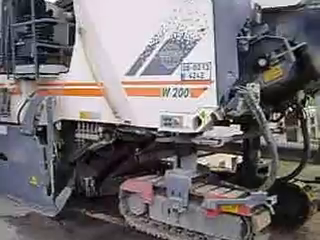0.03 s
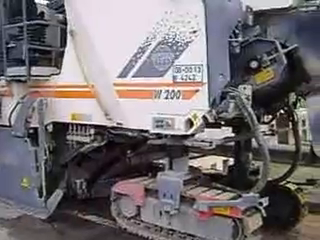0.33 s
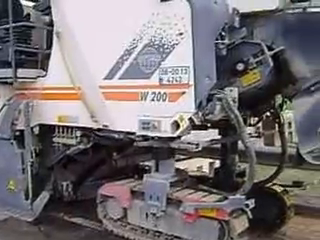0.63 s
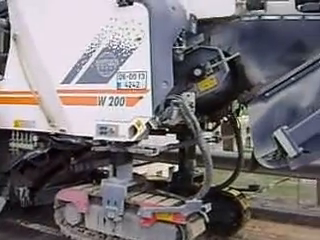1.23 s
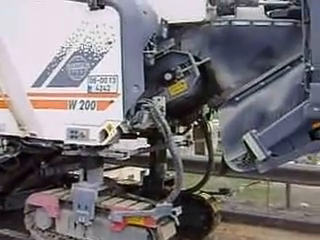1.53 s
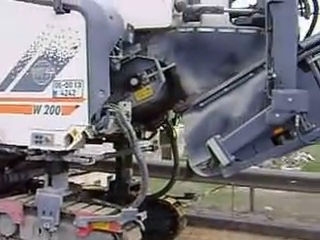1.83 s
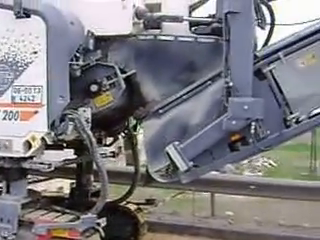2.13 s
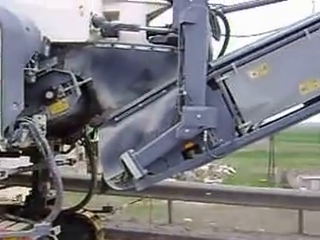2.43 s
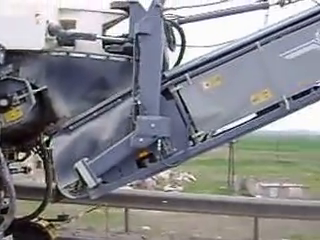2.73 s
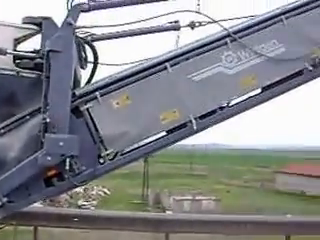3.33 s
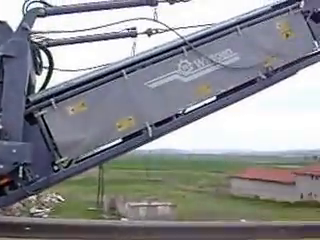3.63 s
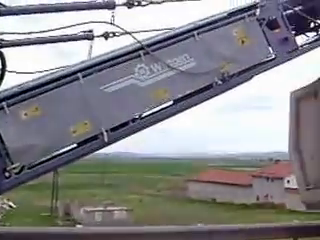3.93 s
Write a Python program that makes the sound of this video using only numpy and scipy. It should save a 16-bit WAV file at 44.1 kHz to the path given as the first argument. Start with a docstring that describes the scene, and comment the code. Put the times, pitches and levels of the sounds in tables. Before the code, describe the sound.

Dense, steady roar of a road milling machine, with crackling grit and lumps hitting steel.

```python
"""A dense roar from the cutting drum and fan of a road milling machine a few metres away.
Grit hisses and crackles on the steel; now and then a lump of asphalt clatters against the panels.
Inside the roar a six-cylinder diesel, two shafts, gears and hydraulic pumps hum and whine.
Tones grow or fade and the hiss drops as the microphone turns from the body to the conveyor."""
import sys
import numpy as np
from scipy import signal
from scipy.fft import rfft, irfft
from scipy.io import wavfile

SR = 44100
rng = np.random.default_rng(int(sys.argv[2]) if len(sys.argv) > 2 else 0)


def waveform_to_disk(signal):
    """Save audio, clipped to [-1, 1], as 16-bit WAV at the path in sys.argv[1]."""
    frames = np.transpose(np.atleast_2d(signal))
    scaled = np.clip(frames, -1, 1) * 32767
    samples = np.round(scaled).astype(np.int16)
    wavfile.write(sys.argv[1], SR, samples)


N = 176400
T, F = np.arange(N) / SR, np.arange(N // 2 + 1) * SR / N + 1e-6


def undb(db):
    """Decibels to gain."""
    return 10 ** (np.asarray(db) / 20)


def unit(x):
    """Scale to rms 1."""
    return x / np.sqrt(np.mean(x ** 2))


def drift(rate_hz):
    """Smooth random curve, rms 1."""
    return unit(irfft(rfft(rng.standard_normal(N)) / (1 + (F / rate_hz) ** 4), N))


def band(lo_hz, hi_hz):
    """Gain of a steep band-pass."""
    return 1 / np.sqrt((1 + (lo_hz / F) ** 20) * (1 + (F / hi_hz) ** 20))


def colour(spectrum):
    """Gain through (f/Hz, level/dB) points, falling away past the ends."""
    hz, db = np.array(spectrum, float).T
    return undb(np.interp(np.log(F), np.log(hz), db)) * band(hz[0], hz[-1])


def ring(modes):
    """Complex response of a set of resonances."""
    return sum(undb(db) / (1 + 1j * (F ** 2 - hz ** 2) / (F * width_hz)) for hz, width_hz, db in modes)


def shaped(x, gain):
    """Filter, then scale to rms 1."""
    return unit(irfft(rfft(x) * gain, N))


def grains(per_s, share):
    """Random small impacts, carrying a share of the power, in a smooth rush."""
    clicks = (rng.random(N) < per_s / SR) * rng.standard_normal(N)
    return np.sqrt(share) * unit(clicks) + np.sqrt(1 - share) * rng.standard_normal(N)


def turn_gain(db, change_db):
    """Gain of a tone over the microphone's turn; passes db at mid-turn."""
    return undb(db + change_db * (T / T[-1] - .5))


def hum(cycles, harmonics):
    """Clean harmonics of a rotating part, random phases."""
    return sum(np.sqrt(2) * turn_gain(db, change_db) * np.sin(2 * np.pi * (k * cycles + rng.random()))
               for k, db, change_db in harmonics)


# Roar and rumble spectra: f/Hz, relative level/dB
ROAR_SPECTRUM = [(65, -29.5), (110, -12.5), (140, -7.5), (182, -5), (212, -4.5), (231, -1), (325, -3),
                 (451, -6), (519, -5.5), (579, -0.5), (654, -2.5), (721, -1), (927, -1), (1090, -4.5),
                 (1180, -6.5), (1220, -7), (1290, -11), (1500, -15.5), (1950, -34), (3300, -120)]
RUMBLE_SPECTRUM = [(18, -23), (28, -17.5), (39, -3.5), (52, -11.5), (75, -7.5), (100, -7), (120, 4.5),
                   (150, -21.5)]


def drum_and_fan():
    """Picks and fan roar over a low rumble; half-octave bands swell together and flicker alone."""
    roar_db, swell_db, flicker_db, rumble_db = -14.5, .43, .53, -31.5
    spectrum = rfft(grains(per_s=600, share=.09)) * colour(ROAR_SPECTRUM)
    half_octaves = 2 * np.log2(np.clip(F / 125, 1, 16))
    bands = (irfft(spectrum * np.maximum(1 - abs(half_octaves - k), 0), N) for k in range(9))
    roar = unit(sum(part * undb(flicker_db * drift(10)) for part in bands))
    rumble = shaped(rng.standard_normal(N), colour(RUMBLE_SPECTRUM))
    return undb(roar_db + swell_db * drift(23)) * roar + undb(rumble_db) * rumble


# Spectrum of grit on steel: f/Hz, relative level/dB
GRIT_SPECTRUM = [(820, -29), (1400, -6.5), (1730, -2), (1920, -4), (2060, -3), (2410, -4), (2590, -3.5),
                 (2660, -6), (2980, -4), (3890, -2.5), (5040, -15), (5930, -28.5), (7710, -74.5),
                 (13000, -120)]
# Hiss over the turn, before trim: t/s, low-band level/dB, high-band level/dB
HISS_LEVELS = [(.1, -26.5, -27), (0.601, -26.5, -26.5), (1.05, -25.5, -26.5), (1.598, -26, -28.5),
               (2.001, -26.5, -28.5), (2.4, -26.5, -29), (3, -28.5, -29.5), (3.399, -31, -30.5),
               (4, -29, -29.5)]


def grit():
    """Crumbs hiss on the steel, fading as the microphone turns off the body."""
    trim_db, flicker_db = -.5, .72
    t_s, low_db, high_db = np.array(HISS_LEVELS).T
    hiss = 0
    for db, lo_hz, hi_hz in (low_db, 1300, 3070), (high_db, 3440, 5700):
        crumbs = shaped(grains(per_s=1400, share=.2), colour(GRIT_SPECTRUM) * band(lo_hz, hi_hz))
        hiss += undb(np.interp(T, t_s, db)) * crumbs
    return hiss * undb(trim_db + flicker_db * drift(4))


# Lump hits: t/s, level/dB, rise/s, decay/s, low f/Hz, high f/Hz, dry crunch beside the ring/dB
LUMP_HITS = [(0.751, -14, 0.0052, 0.028, 2950, 4060, -2), (.85, -20.5, .004, 0.026, 2600, 4600, -4),
             (1.016, -26, .004, 0.036, 1550, 2830, -4), (1.292, -20, 0.0022, 0.014, 3000, 4200, -10),
             (1.357, -20.5, 0.0048, 0.033, 3070, 4810, -13), (1.407, -16.5, 0.0024, .014, 3000, 4170, -12),
             (1.468, -16.5, 0.0066, 0.021, 2500, 3900, 11), (1.779, -16.5, 0.0081, 0.026, 2800, 4300, -1),
             (2.1077, -11.5, 0.0013, 0.024, 1710, 4350, -19), (2.175, -25, 0.0045, 0.016, 3900, 4660, -8),
             (2.608, -26, 0.0043, 0.02, 4300, 4770, -22), (2.82, -28.5, .005, .03, 3270, 5050, -14),
             (3.159, -16.5, 0.027, 0.033, 1920, 4630, 9.5)]
# Panel resonances: f/Hz, width/Hz, relative level/dB
PANEL_MODES = [(1880, 80, 2), (2140, 110, 0), (2530, 80, -7), (3200, 70, -8), (3460, 90, 0), (3610, 60, -1),
               (3930, 100, 2), (4320, 70, -7), (4680, 90, -11)]


def lumps():
    """Each lump strikes, then shatters in a spray of impacts that rings part of the panel's modes."""
    strike_db, strike_s = -9.5, .0017
    out, panel = 0, abs(ring(PANEL_MODES))
    for t_s, db, rise_s, decay_s, lo_hz, hi_hz, crunch_db in LUMP_HITS:
        age_s = T - t_s
        envelope = np.clip(age_s / rise_s, 0, 1) * np.exp(-np.maximum(age_s - rise_s, 0) / decay_s)
        envelope *= 1 + undb(strike_db) * np.exp(-abs(age_s) / strike_s)
        response = (panel + undb(crunch_db)) * band(lo_hz, hi_hz)
        out += undb(db) * envelope * shaped(grains(per_s=2000, share=.29), response)
    return out


# Firing harmonics: multiple, level/dB, change over turn/dB
FIRING_HARMONICS = [(2, -33.5, 2.5), (3, -25.8, 4), (4, -48, -1), (6, -35.5, 16)]
# Exhaust and casing resonances: f/Hz, width/Hz, relative level/dB
EXHAUST_MODES = [(137.5, 9, 4), (149.6, 10, -4), (245, 46, -3), (288.4, 28, -4.5), (590.6, 14, 2)]


def diesel(clock_s):
    """Uneven firings ring the exhaust over the engine's steady note."""
    firing_hz, scatter, exhaust_db = 76.52, 1.3, -27.5
    cycles = firing_hz * clock_s
    firings = np.diff(np.floor(cycles), prepend=0) * (1 + scatter * rng.standard_normal(N))
    exhaust = shaped(firings, ring(EXHAUST_MODES) * band(140, 750))
    return hum(cycles, FIRING_HARMONICS) + undb(exhaust_db) * exhaust


# Shaft and pump harmonics: multiple, level/dB, change over turn/dB
FAST_SHAFT_HARMONICS = [(1, -50, 6.5), (2, -34.5, -2.5), (4, -46, 5), (5, -40, -6)]
SLOW_SHAFT_HARMONICS = [(2, -41, 0), (3, -49, 0), (4, -38, 0), (6, -37, 0), (8, -43, 0), (15, -43, 0)]
PUMP_HARMONICS = [(1, -40, -2), (2, -29.5, 6), (3, -35.5, 10), (4, -31, -0.5)]


def shafts_and_pump(clock_s):
    """Two shafts throb against each other under the pump's drone."""
    fast_hz, slow_hz, pump_hz = 29.27, 24.98, 137.6
    shafts = hum(fast_hz * clock_s, FAST_SHAFT_HARMONICS) + hum(slow_hz * clock_s, SLOW_SHAFT_HARMONICS)
    return shafts + hum(pump_hz * clock_s, PUMP_HARMONICS)


# Gear and hydraulic tones: f/Hz, level/dB, change over turn/dB, pitch wander/fraction
GEAR_TONES = [(133.4, -35, -8, .004), (582, -31, -3, .0012), (590.2, -34.5, 0, .0008), (624, -39, 0, .001),
              (734, -36.5, 0, .0015), (798.5, -36.5, 0, .001), (920, -39, 0, .001), (1147, -37, 0, .001),
              (1199.3, -27.9, 3.5, .001), (1266, -39.5, -2, .002)]
# Thin whistles on the body side: same columns
BODY_WHISTLES = [(2534, -40.5, -7, .002), (3165, -48, 0, .0015), (4015, -44, -4, .003)]


def whines():
    """Gear and hydraulic tones and thin whistles, each wavering in pitch and strength."""
    out, flutter_db = 0, 1.8
    for hz, db, change_db, wander in GEAR_TONES + BODY_WHISTLES:
        cycles = np.cumsum(hz * (1 + wander * drift(8.45))) / SR
        tone = np.sin(2 * np.pi * cycles) * undb(flutter_db * drift(6))
        out += turn_gain(db, change_db) * unit(tone)
    return out


def scene():
    """Mono mix; diesel, shafts and pump follow one governed speed."""
    speed = 1 + .00054 * drift(2)
    clock_s = np.cumsum(speed) / SR
    machinery = diesel(clock_s) + shafts_and_pump(clock_s) + whines()
    return (machinery + drum_and_fan() + grit() + lumps())[None]


def lowpass(x, hz):
    """Steep treble cut."""
    return signal.sosfilt(signal.ellip(10, .1, 80, hz, fs=SR, output="sos"), x)


def record(dry):
    """Fade in, round the peaks, narrow the band; the highest peaks clip and tick faintly."""
    start_s, fade_s = .052, .012
    soft_limit, ceiling = .695, .705
    faded = dry * np.clip((T - start_s) / fade_s, 0, 1)
    rounded = faded / (1 + (faded / soft_limit) ** 10) ** (1 / 10)
    clipped = np.clip(lowpass(rounded, hz=6050), -ceiling, ceiling)
    return lowpass(clipped, hz=15800)


dry = scene()
out = record(dry)
waveform_to_disk(out)
```